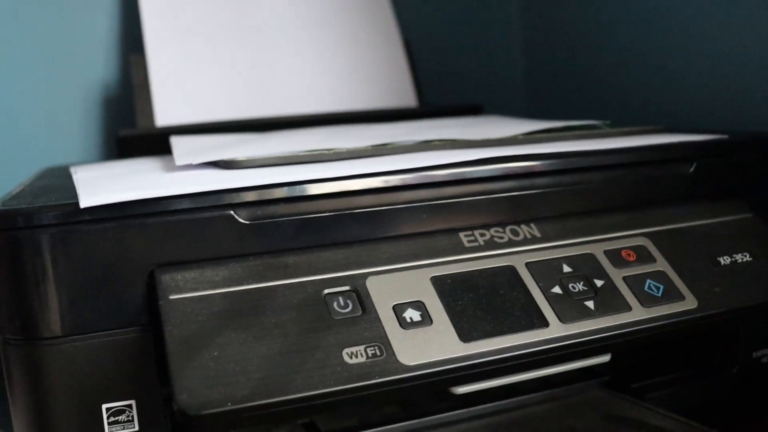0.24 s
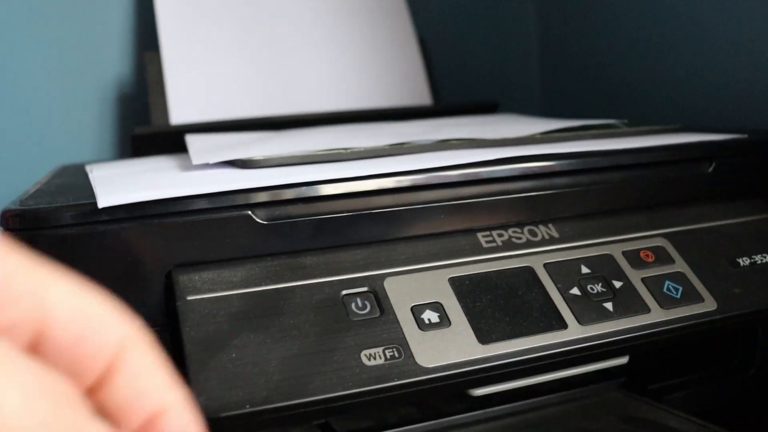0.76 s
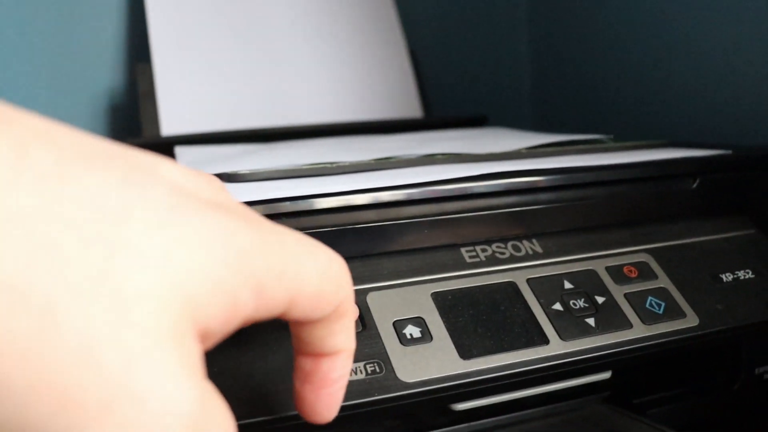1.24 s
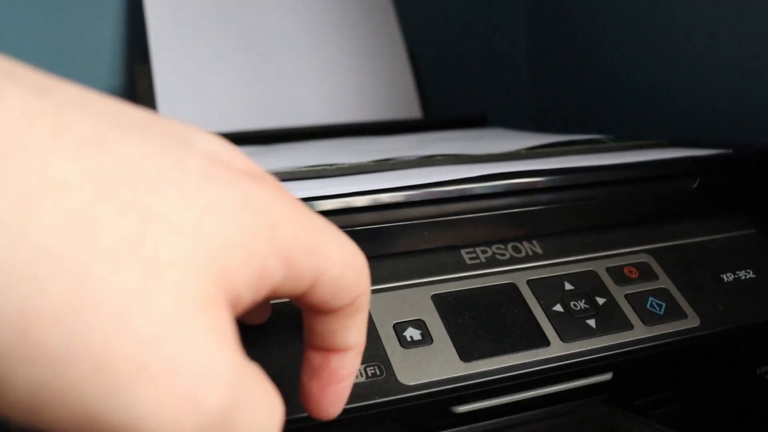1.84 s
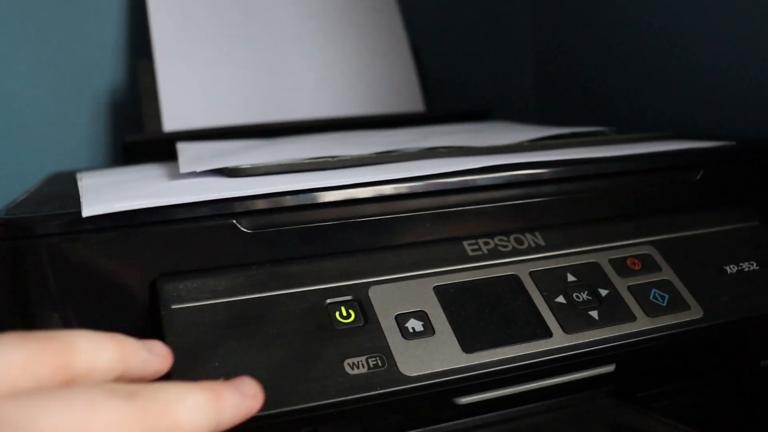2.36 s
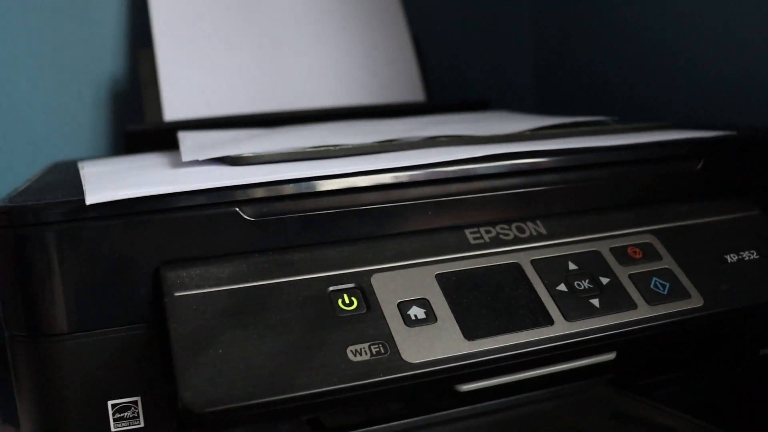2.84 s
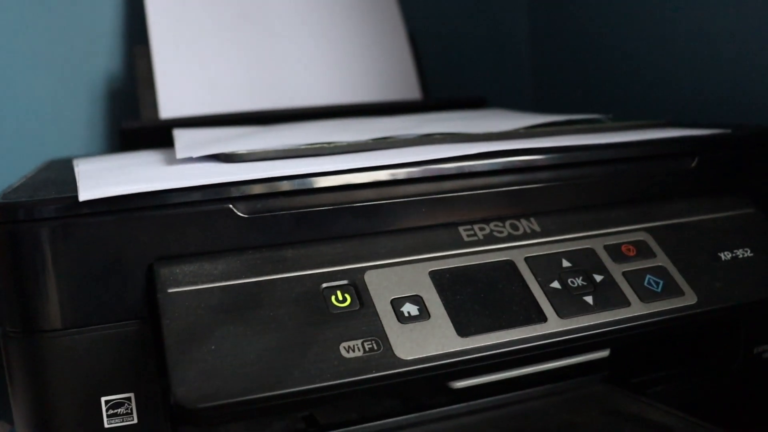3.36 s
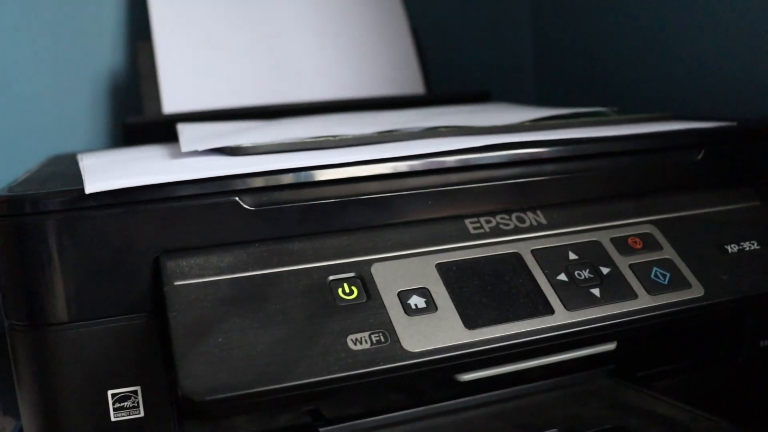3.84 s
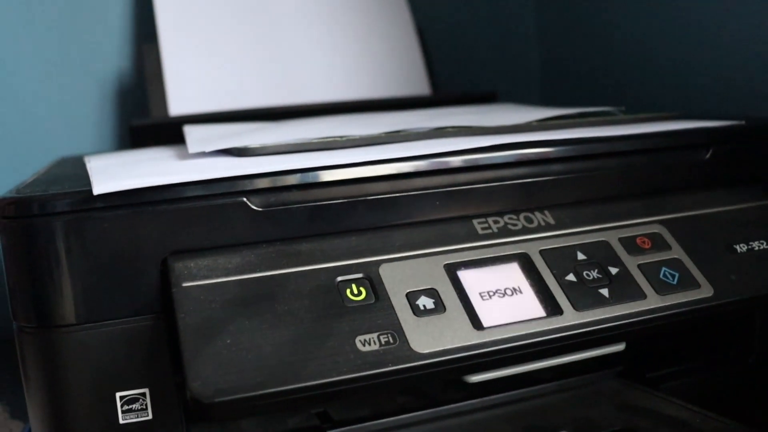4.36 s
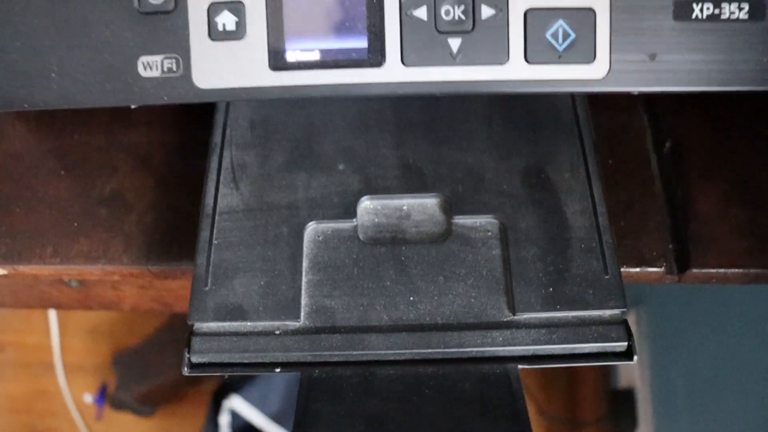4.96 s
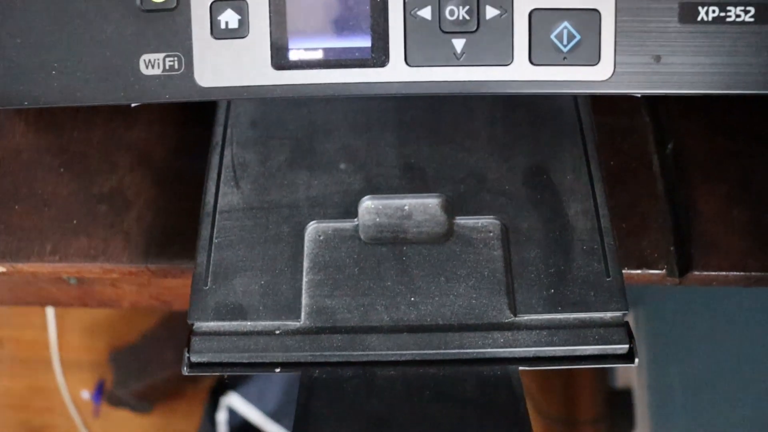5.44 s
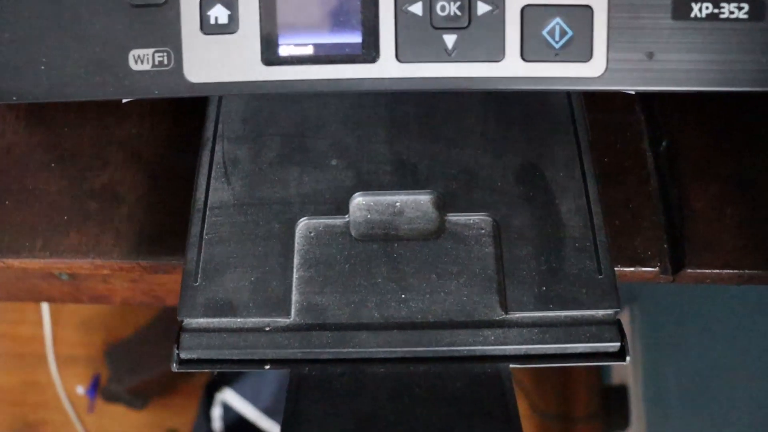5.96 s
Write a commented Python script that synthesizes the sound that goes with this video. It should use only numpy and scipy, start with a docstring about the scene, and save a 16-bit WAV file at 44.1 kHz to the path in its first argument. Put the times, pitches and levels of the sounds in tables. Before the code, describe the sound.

Close indoor handling: soft cloth rustle, faint bumps, crisp power-button clicks, quiet, then a sudden cut to a printer carriage shuttling, hissing and thumping.

```python
"""Close to two microphones in a small room, a sleeve rustles as a finger slides onto a printer's front panel.
The finger rubs, presses and releases the power button: snaps ring the panel, then the arm draws back.
After a cut the inkjet printer is at work: the carriage whirs to and fro about twice a second,
and at each turn the paper feed clacks and thumps in the plastic case.
Filtered noise makes the cloth and hiss, dying sines the knocks, unsteady sines the motor, belt and groans."""
import sys
import numpy as np
from scipy import signal
from scipy.fft import rfft, irfft
from scipy.io import wavfile

SR = 44100
rng = np.random.default_rng(int(sys.argv[2]) if len(sys.argv) > 2 else 0)


def transcribe(u):
    """Save the signal u as a 16-bit wav file named by the first command-line argument.

    u: samples, shape (n,) or (channels, n), limited to [-1, 1]; the rate is SR.
    q: integer samples, one column per channel.
    """
    v = np.clip(np.atleast_2d(u).T, -1, 1)
    q = np.round(v * 32767).astype(np.int16)
    wavfile.write(sys.argv[1], SR, q)


N = 273420
T, HZ = np.arange(N) / SR, np.fft.rfftfreq(N, 1 / SR)


def amp(db):
    """Decibels to gain."""
    return 10 ** (np.asarray(db) / 20)


def unit(x):
    """Scales to rms 1."""
    return x / np.sqrt(np.mean(x ** 2) + 1e-20)


def read(points, hz):
    """Reads a table on a log-frequency axis."""
    f, value = np.transpose(points)
    return np.interp(np.log(hz + 1), np.log(f + 1), value)


def add(mix, s, sound):
    """Mixes a stereo sound in at time s."""
    part = mix[:, round(s * SR):][:, :sound.shape[1]]
    part += sound[:, :part.shape[1]]


def sides(pan_db):
    """Left and right gains; pan_db is left minus right."""
    return amp(np.array([[pan_db], [-pan_db]]) / 2)


def wander(rate):
    """Slow random motion of rms 1, with little above rate in Hz."""
    count = N // 16
    spectrum = rfft(rng.standard_normal(count))
    slow = irfft(spectrum / (1 + (HZ[:count // 2 + 1] / rate) ** 4), count)
    return unit(np.interp(T, np.linspace(0, T[-1], count), slow))


def swell(s, half_s, db):
    """A smooth rise and fall around time s."""
    return amp(db) * np.exp(-((T - s) / half_s) ** 2)


def held(start, end, db, edge_s):
    """Rises around start, holds, falls around end."""
    return amp(db) * np.clip(.5 + np.minimum(T - start, end - T) / (2 * edge_s), 0, 1)


def shelf(hz, corner_hz):
    """Rises from 0 below the corner to 1 above."""
    return 1 - 1 / (1 + (hz / corner_hz) ** 5.0)


def peaks(rows):
    """Resonances as dB over frequency."""
    return sum(db / (1 + (2 * (HZ - hz) / width) ** 2) for hz, width, db in rows)


# how alike the sound is at the two microphones: (frequency [Hz], left-right likeness [0..1])
MICROPHONE_LIKENESS = [(100, 1), (300, 0.94), (700, 0.66), (1500, 0.26), (4000, 0.17), (15000, 0.048)]


def noise(db, lag_ms=0, alike=1):
    """Stereo noise of a given spectrum, most alike in the bass; it reaches the right side lag_ms later."""
    a, b = rfft(rng.standard_normal((2, N)))
    c = np.clip(alike * read(MICROPHONE_LIKENESS, HZ), 0, 1)
    right = c * a + np.sqrt(1 - c ** 2) * b
    right = right * np.exp(-2j * np.pi * HZ * lag_ms / 1000)
    return unit(irfft(np.array([a, right]) * amp(db), N))


def colour(x, gain_db, size=2048):
    """Causal minimum-phase filter with the gain gain_db(hz)."""
    hz = abs(np.fft.fftfreq(size, 1 / SR))
    log_gain = np.log(amp(np.maximum(gain_db(hz), -90)))
    taps = np.fft.ifft(np.exp(np.conj(signal.hilbert(log_gain)))).real
    return signal.fftconvolve(x, taps[None], axes=1)[:, :x.shape[1]]


def resonate(x, hz, width):
    """A resonance that follows the curve hz: shifts it down to 0 Hz, smooths, shifts back up."""
    turn, r = np.exp(2j * np.pi * np.cumsum(hz) / SR), np.exp(-np.pi * width / SR)
    low = signal.lfilter([(1 - r) ** 2], [1, -2 * r, r * r], x / turn)
    return unit((turn * low).real)


def ring(modes, t, spread):
    """Dying modes; each blow shifts them a little in pitch."""
    total = 0
    for k, (hz, db, t60) in enumerate(modes):
        pitch = hz * (1 + spread * rng.standard_normal())
        total = total + (-1) ** k * amp(db - 60 * t / t60) * np.sin(2 * np.pi * pitch * t)
    return total


def squeaks(rows, waver, flutter_db):
    """Short tones of sticking and slipping, unsteady in pitch and level."""
    clock = np.cumsum(1 + waver * wander(95)) / SR
    tones = sum(swell(s, half_s, db) * np.sin(2 * np.pi * hz * clock) for s, half_s, db, hz in rows)
    return np.sqrt(2) * amp(flutter_db * wander(91)) * tones


# decay of the small room: (frequency [Hz], t60 [s])
ROOM_T60 = [(150, 0.28), (600, 0.38), (2000, 0.17), (4500, 0.33), (8000, 0.14), (15000, 0.064)]


def room(x):
    """Diffuse tail of a small room, each band dying at its own speed."""
    hz, t, z = signal.stft(rng.standard_normal((2, SR // 2)), SR, nperseg=256)
    c = np.clip(read(MICROPHONE_LIKENESS, hz), 0, 1)[:, None]
    z[1] = c * z[0] + np.sqrt(1 - c ** 2) * z[1]
    tail = signal.istft(z * amp(-60 * t / read(ROOM_T60, hz)[:, None]), SR, nperseg=256)[1]
    tail *= np.minimum(np.arange(tail.shape[1]) / SR / 0.011, 1)  # builds up over 11 ms
    return signal.fftconvolve(x, tail / np.linalg.norm(tail[0]), axes=1)[:, :x.shape[1]]


# spectrum of the room's air: (frequency [Hz], relative level [dB per Hz])
AIR = [(15, -40), (25, -13.5), (97, -5.5), (120, -4.5), (161, -9.5), (249, -10.5), (1020, -17), (2160, -17),
       (2760, -19), (3620, -18.5), (4250, -18), (12500, -26), (16000, -25.5)]


def room_air():
    """Steady background noise of the place, only partly alike at the two microphones."""
    return amp(-58.0) * noise(read(AIR, HZ), 0, 0.55)


# spectrum of sliding cloth: (frequency [Hz], relative level [dB per Hz])
CLOTH = [(120, -43), (200, -12), (305, 5), (340, -8), (558, -5), (777, -7), (1080, -4.5), (1650, -7),
         (1980, -4), (2380, -7.5), (4120, -5.5), (15100, -24.5), (16000, -107)]
# the arm reaches in and draws back: (start [s], end [s], rustle level [dB])
REACHES = [(-.05, 0.37, -49), (.6, 1.774, -50), (1.895, 2.707, -52.5)]
# faint rustle for as long as the arm is out: (start [s], end [s], level [dB])
SHIFTING = (-.1, 3.05, -54.5)
# the arm settles: (middle [s], half length [s], level [dB])
SHUFFLE = (3.08, 0.076, -51)
# hollow colour of that settling: (frequency [Hz], width [Hz], boost [dB])
SHUFFLE_RINGS = [(400, 17, 14), (563, 17, 15.5), (1400, 70, 6), (1780, 67, 12.5)]
# rasping strokes of the sleeve: (middle [s], half length [s], level [dB], pitch [Hz])
RASPS = [(.05, 0.4, -51.5, 4200), (0.747, 0.059, -52.5, 3900), (0.94, 0.047, -51, 3460),
         (1.133, 0.06, -56, 5300), (1.307, 0.28, -55.5, 3520), (2.033, 0.061, -52, 3700),
         (2.6, 0.083, -53, 3450), (3.009, 0.14, -58, 3250)]
# quick, bright swishes of cloth: (middle [s], half length [s], level [dB])
SWISHES = [(0.104, 0.46, -56.5), (0.64, 0.15, -54.5), (1.145, 0.17, -56.5), (2.295, 0.1, -56.5),
           (2.454, 0.067, -49), (2.68, 0.11, -57), (4.283, 0.087, -43.5), (4.453, 0.061, -38.5)]
# spectrum of the swishes: (frequency [Hz], relative level [dB per Hz])
SWISH_COLOUR = [(880, -19), (1500, -11), (1590, -11.5), (1790, -20), (1940, -14), (2970, -8), (3250, -2.5),
                (4920, 0), (14100, -12), (16000, -16)]
REACH_EDGE_S = 0.055  # the arm gathers speed and comes to rest


def sleeve():
    """Cloth slides over cloth as the arm moves, with a slight flutter and a moving rasp."""
    moving = np.max([held(*row, REACH_EDGE_S) for row in [*REACHES, SHIFTING]], axis=0)
    reach = moving * noise(read(CLOTH, HZ), 0.17, 0.89)
    hollow_db = read(CLOTH, HZ) + peaks(SHUFFLE_RINGS) - 8 * shelf(HZ, 3800)
    shuffle = swell(*SHUFFLE) * noise(hollow_db, 0.11, 0.82)
    s, _, _, hz = np.transpose(RASPS)
    strokes = sum(swell(*row[:3]) for row in RASPS)
    rasp = strokes * resonate(noise(0 * HZ, 0.17, 1.44), np.interp(T, s, hz), 1360)
    swish = sum(swell(*row) for row in SWISHES) * noise(read(SWISH_COLOUR, HZ), 0.233, 0.9)
    flutter = amp(1.0 * wander(63))
    return (reach + shuffle + rasp + swish + whistle()) * flutter


# soft handling bumps:
# (time [s], level [dB], rise [s], t60 [s], dull above [Hz], relative midrange [dB])
BUMPS = [(.04, -52.5, 0.026, 0.93, 440, -45), (0.196, -42, 0.024, 0.6, 360, -21.5),
         (0.719, -46, 0.03, 0.34, 477, -35), (1.622, -45.5, 0.016, 0.24, 220, -50),
         (1.85, -41.5, 0.014, 0.45, 302, -29), (3.335, -48, 0.057, 0.43, 317, -40),
         (3.40, -51, 0.047, 0.42, 364, -46)]
# light, dull taps: (time [s], level [dB])
TAPS = [(3.797, -52), (3.898, -39.5), (3.9222, -44.5)]
# ringing of a tap: (frequency [Hz], relative level [dB], t60 [s])
TAP_MODES = [(193, -5, 0.031), (307, -1, 0.026), (530, -5, 0.028)]
# brief soft hoots as the hand moves: (middle [s], half length [s], level [dB], pitch [Hz])
HOOTS = [(0.655, 0.035, -52, 582), (1.085, 0.036, -50.5, 750), (1.575, 0.034, -53, 448)]
BUMP_LOW_HZ = 100  # the microphones lose the bass below this


def handling():
    """Dull noise bumps, light ringing taps and soft hoots close to the microphones."""
    out, t = np.zeros((2, N)), np.arange(SR // 8) / SR
    for s, db, rise, t60, dull_hz, middle_db in BUMPS:
        age = np.maximum(T - s, 0)
        shape = np.minimum(age / rise, 1) * amp(db - 60 * np.maximum(age - rise, 0) / t60)
        body = 1 - shelf(HZ, dull_hz) + amp(middle_db) * (1 - shelf(HZ, 1638))
        power = body / (1 + (BUMP_LOW_HZ / (HZ + 1)) ** 3)
        out += shape * noise(10 * np.log10(power + 1e-12))
    for s, db in TAPS:
        add(out, s, amp(db) * ring(TAP_MODES, t, 0.042) * sides(0))
    return out + squeaks(HOOTS, 0.016, 3.5)


# the fingertip slides on the panel: (start [s], end [s], relative level [dB])
RUB = (1.066, 1.505, -41)
# a fainter rub that runs on from the slide through the press: (start [s], end [s], relative level [dB])
FAINT_RUB = (1.2, 1.78, -47)
# spectrum of the rub: (frequency [Hz], relative level [dB per Hz])
RUB_COLOUR = [(180, -11), (320, -8.5), (500, -6.5), (1060, -11.5), (1500, -8), (1900, -10), (2200, -10),
              (2600, -7), (3400, -34), (7000, -70)]
# resonances of the rub: (frequency [Hz], width [Hz], relative level [dB])
RUB_RINGS = [(756, 55, -18.5), (1208, 54, -12.5), (1334, 100, -13), (1663, 84, -7.5), (1882, 120, -5),
             (2580, 220, -16)]
# the fingertip sticks and judders: (middle [s], half length [s], level [dB], pitch [Hz])
JUDDERS = [(1.16, 0.043, -49.5, 221.4), (1.338, 0.016, -45.5, 257), (1.388, 0.015, -45, 240),
           (1.437, 0.0096, -44.5, 247.5)]
RUB_EDGE_S = 0.083  # it starts and stops softly
RUB_DRIFT = 0.0029  # share by which the resonances wander
SLIPS_PER_S = 95  # about how often the fingertip catches and slips


def fingertip():
    """Skin rubs on the front panel; its resonances drift and flare in turn, and it judders as it grips."""
    force = np.maximum(held(*RUB, RUB_EDGE_S), held(*FAINT_RUB, RUB_EDGE_S))
    rub = noise(read(RUB_COLOUR, HZ), -0.03, 2.0) * amp(-5.0 + 0.93 * wander(70))
    slips = np.cumsum(SLIPS_PER_S * np.exp(.5 * wander(60))) / SR
    catching = unit(.3 + np.exp(-(slips % 1) / .2))  # each slip starts sharply and dies away
    drive = noise(0 * HZ, -0.035, 0.9) * catching
    rub = rub * np.sqrt(catching)
    for hz, width, db in RUB_RINGS:
        pitch = hz * (1 + RUB_DRIFT * wander(8.3))
        rub = rub + amp(db + 1.4 * wander(12)) * resonate(drive, pitch, width)
    return (force * rub + squeaks(JUDDERS, 0.059, 1.9)) * sides(-1.5)


# snaps of the power button: (time [s], relative level [dB], treble gain [dB], treble above [Hz],
# room send [dB], thin below [Hz], relative spring level [dB])
BUTTON = [(1.5919, -19.5, -4.5, 2700, -17, 200, -9.5), (1.6106, 0.5, -1, 2700, -15, 191, 7),
          (1.8128, -26, -10.5, 2700, -2.5, 500, -19.5), (1.843, 2.5, -15.5, 2940, -14.5, 556, -4),
          (1.8925, -18.5, -4, 2720, -9, 447, 7)]
# colour of the panel: (frequency [Hz], gain [dB])
PANEL = [(100, -46), (250, -8), (450, -12), (800, -4), (1150, -5), (1500, -2.5), (1900, -0.5), (2500, -4),
         (3100, -8), (3900, -5.5), (4900, -15), (5800, -15.5), (8500, -13), (15000, -18.5)]
# ringing of the front panel: (frequency [Hz], relative level [dB], t60 [s])
PANEL_MODES = [(276, -10.5, 0.15), (659, -11.5, 0.14), (1098, -6, 0.062), (1580, -6, 0.057),
               (1880, 6, 0.027), (2430, 7, 0.027), (4010, -0.5, 0.042)]
# ping of the spring: (frequency [Hz], relative level [dB], t60 [s])
SPRING_MODES = [(4430, -1.4, 0.022), (4600, 1, 0.026), (4970, 1, 0.025), (5220, -1.96, 0.02)]
RATTLE_DB, RATTLE_T60_S, RATTLE_PER_S = -15.5, .13, 420  # loose parts chatter after each snap
PANEL_RING_DB = -20.5


def button():
    """The switch snaps: a sharp spike, scatter and loose rattle, the panel's modes and the spring's ping."""
    out, t = np.zeros((2, N)), np.arange(SR // 2) / SR
    for s, db, treble_db, treble_hz, room_db, low_hz, spring_db in BUTTON:
        scatter = 0.25 * noise(0 * HZ, -0.036, 2.3)[:, :len(t)] * amp(-60 * t / 0.041)
        chance = rng.random((3, len(t))) < RATTLE_PER_S / SR
        knocks = rng.standard_normal((3, len(t))) * chance
        loose = unit(knocks[:2] + 1.5 * knocks[2])  # the third row is common to both sides
        scatter += 0.23 * amp(RATTLE_DB - 60 * t / RATTLE_T60_S) * loose
        # the spike comes two samples later on the left
        scatter[0, 10] += 2.9
        scatter[1, 8] += 2.9
        modes = ring(PANEL_MODES, t, 0.0079) + amp(spring_db) * ring(SPRING_MODES, t, 0.0078)
        # the modes build up as the snap spreads across the panel
        modes = modes * (1 - np.exp(-t / 0.004))
        hit = amp(10.0) * colour(scatter, lambda hz: read(PANEL, hz)) + amp(PANEL_RING_DB) * modes
        hit = colour(hit, lambda hz: treble_db * shelf(hz, treble_hz) + 10 * np.log10(shelf(hz, low_hz) + 1e-5))
        add(out, s, amp(db) * (hit + amp(room_db) * room(hit)))
    return out * sides(-1.8)


# a thin whistle in the rustle: (time [s], pitch [Hz], level [dB])
WHISTLE = [(2.27, 4330, -66), (2.36, 4230, -56.5), (2.5, 4020, -63), (2.55, 3400, -56), (2.6, 3500, -52),
           (2.67, 3380, -68)]


def whistle():
    """A thin, fuzzy whistle in the rustle, noise in a narrow band that mostly sinks in pitch."""
    s, hz, db = np.transpose(WHISTLE)
    level = amp(np.interp(T, s, db, left=-120, right=-120))
    return level * resonate(noise(0 * HZ, 0.2, 1.6), np.interp(T, s, hz), width=320)


# the carriage stands still and reverses, every other time at the loud end: (time [s])
TURNS = [4.27, 4.737, 5.205, 5.684, 6.151]
# spectrum of the sliding hiss: (frequency [Hz], relative level [dB per Hz])
RAIL = [(260, -17), (450, -46), (572, -21), (625, -1.5), (806, -7), (1040, -2.5), (1150, -7.5),
        (1360, -3.5), (2160, -11), (3430, -14), (4490, -12), (6340, -12), (9920, -21), (15100, -18),
        (16000, -38)]
# resonances of the rail and frame: (frequency [Hz], width [Hz], boost [dB])
FRAME = [(980, 370, 0), (1337, 92, 0), (1730, 520, 4.5), (2697, 42, 11), (3375, 540, 7), (3960, 410, 5.5),
         (5260, 110, 7.5), (6140, 260, 6.5), (8800, 140, 6)]
# steady tones of the frame while the carriage runs: (frequency [Hz], relative level [dB])
GEARS = [(438, -58), (660, -56.5), (1050, -58.5), (1376, -53.5), (1701, -65)]
# the motor's tones, which glide at each turn: (frequency at full speed [Hz], relative level [dB])
MOTOR = [(306, -53.5), (612, -50)]
# balance of the carriage: (frequency [Hz], left minus right [dB])
BALANCE_DB = [(100, 0), (500, 3), (1000, 0), (2500, -5), (6000, -5), (13000, -6)]
MOTOR_SAG = .42  # share of its pitch that the motor loses in a turn
MOTOR_RAMP_S, MOTOR_BRAKE_S = 0.135, 0.075  # standstill to full speed, and back
MOTOR_LEAD_S, MOTOR_NEAR_S, MOTOR_NEAR_DB = 0.073, 0.088, 9  # it sings out just before the loud end


def carriage():
    """The carriage brakes and speeds up around each turn; its hiss and tones swell and sink with it."""
    from_turn = abs(T[:, None] - np.array(TURNS)).min(1)
    speed = np.sin(np.pi / 2 * np.clip(from_turn / 0.31, 0, 1))
    sliding = np.clip((from_turn - .03) / 0.023, 0, 1)
    # +1 at the louder end of the rail, -1 at the other
    place = np.cos(np.pi * np.interp(T, TURNS, np.arange(len(TURNS))))
    # the pulley makes the hiss throb
    throb = amp(0.89 * np.sin(2 * np.pi * 19.0 * T) + 1.0 * wander(100))
    hiss = amp(-39.5) * noise(read(RAIL, HZ) + peaks(FRAME), -0.085) * (0.31 + 0.39 * sliding) * throb
    tones = np.zeros((2, N))
    for hz, db in GEARS:
        offset = rng.standard_normal((2, 1)) * min(hz / 2500, 2)  # the sides differ more in high tones
        swell_db = 12.4 * place * (1 - shelf(hz, 640))
        drift = (0.17 + hz / 2200) * wander(16.0)
        level = amp(db + swell_db + 0.2 + 0.74 * wander(26) + 2.1 * wander(3.8))
        tones += level * np.sqrt(speed) * np.sin(2 * np.pi * hz * T + offset + 1.3 * drift)
    ramps = [np.maximum((T - s) / MOTOR_RAMP_S, (s - T) / MOTOR_BRAKE_S) for s in TURNS]
    drive = np.min(np.clip(ramps, 0, 1), axis=0)
    shaft = np.cumsum((1 - MOTOR_SAG * (1 - drive)) * (1 + 0.0017 * wander(24))) / SR
    near_db = MOTOR_NEAR_DB * sum(swell(s - MOTOR_LEAD_S, MOTOR_NEAR_S, 0) for s in TURNS[::2])
    # loudest part-way between standstill and full speed
    load_db = 6.5 * np.sin(np.pi * drive)
    # it falls quiet around each turn
    powered = 1 - np.clip(sum(swell(s - .025, 0.029, 0) for s in TURNS), 0, 1)
    motor = 0
    for hz, db in MOTOR:
        level = amp(db + near_db + load_db + 1.5 * place + 1.8 * wander(30))
        motor = motor + drive * powered * level * np.sin(2 * np.pi * hz * shaft)
    whir = amp(-54.5 + 10.0 * place) * resonate(noise(0 * HZ), 500 * (.5 + .5 * speed), 490)
    balance = amp(np.array([[.5], [-.5]]) * read(BALANCE_DB, HZ))
    return irfft(rfft(hiss + amp(3.0) * tones + motor + whir) * balance, N)


# spectrum of the shaking case: (frequency [Hz], relative level [dB per Hz])
CASE = [(18, -66), (30, -58), (80, -27), (118, -14), (140, 7), (183, -2.5), (297, 3.5), (400, -9.5),
        (442, -11), (571, -7.5), (604, -10.5), (803, -25), (900, -11), (1170, -21), (1980, -120)]
# pitch of the belt's wandering hum: (time [s], pitch [Hz])
BELT = [(4.48, 117.5), (4.56, 120.6), (4.8, 169.2), (4.94, 155.1), (5.09, 137.7), (5.49, 135.5),
        (5.6, 122.6), (6.08, 112.4), (6.2, 138)]
# the hum swells where it meets a resonance of the case: (middle [s], half length [s], level [dB])
BELT_SWELLS = [(4.486, .025, -48), (4.64, 0.039, -37), (4.763, 0.064, -38), (4.912, .04, -38.5),
               (5.12, 0.03, -42), (5.467, 0.033, -35.5), (5.853, 0.058, -50)]
BELT_DB = -52.5  # between swells
# the case shakes harder around each turn, and more so as the carriage nears the loud end
SHAKE_DB, SHAKE_TURN_DB, SHAKE_END_DB, SHAKE_END_S = -42, 1.5, 4, 0.14


def case():
    """The moving mass shakes the case, most where it reverses, and the belt hums at a wandering pitch."""
    turns = np.cumsum(np.interp(T, *np.transpose(BELT)) * (1 + 0.013 * wander(40))) / SR
    strength = amp(BELT_DB) + sum(swell(*row) for row in BELT_SWELLS)
    belt = np.sqrt(2) * strength * amp(3.0 * wander(32)) * np.sin(2 * np.pi * turns)
    reversing = sum(swell(s, SHAKE_END_S, 0) for s in TURNS)
    loud_end = sum(swell(s - .06, SHAKE_END_S, 0) for s in TURNS[::2])
    shake = amp(SHAKE_DB + SHAKE_TURN_DB * reversing + SHAKE_END_DB * loud_end)
    notch_db = 7 / (1 + ((HZ - 138) / 30) ** 2)
    drone = shake * noise(read(CASE, HZ) - notch_db)
    return (belt + drone) * sides(-1.1)


# paper feed clacks: (time [s], relative level [dB], treble gain [dB], attack [s])
CLACKS = [(4.696, -26, 7.5, 0.00039), (4.715, -30, 2, .001), (4.744, -31.5, -6, .0006),
          (5.156, -29.5, 13, 0.00079), (5.168, -25, -11, 0.0009), (5.2008, -34, -7, 0.00078),
          (5.2192, -32, -1, 0.0003), (5.2305, -37, 1, .0004), (5.293, -39, -14, .0005),
          (5.642, -29, 4, .0005), (5.659, -27, -17, 0.00075), (5.6935, -32, -11, 0.00047),
          (6.126, -24, -6, 0.0043), (6.168, -34, -3, .0005), (6.178, -35, 3.5, 0.00047)]
# the feed's plastic parts: (frequency [Hz], relative level [dB], t60 [s])
LEVER_MODES = [(767, 0.5, 0.043), (1060, -4, 0.072), (1270, -1.5, 0.17), (1950, -1.5, 0.14),
               (2560, -2, 0.05)]
# spectrum of a clack: (frequency [Hz], gain [dB])
CLACK_COLOUR = [(240, -27), (400, -13.5), (784, 1), (910, -1), (1040, 3), (1670, -5), (2040, -3),
                (3060, -9), (3450, -10), (4060, -19), (10000, -42.5), (13000, -73), (22000, -120)]
# thumps of the mechanism:
# (time [s], relative level [dB], t60 of the damping by the parts in contact [s])
THUMPS = [(4.475, -35, 0.33), (4.677, -18.5, 0.043), (4.757, -25.5, 0.49), (5.149, -17, 0.037),
          (5.2198, -19, 0.38), (5.237, -30, 0.36), (5.259, -28, 0.11), (5.6249, -28.5, 0.24),
          (5.699, -26, 0.39), (6.096, -21.5, 0.075), (6.1737, -14, 0.068)]
# ringing of the case: (frequency [Hz], relative level [dB], t60 before that damping [s])
CASE_MODES = [(133.5, -3, 0.24), (224, 5, 0.063), (291, -2.5, 0.17), (321.3, 4, 0.1), (454, -5, 0.026)]
# the feed's thin whine: (frequency [Hz], level [dB])
WHINE = [(13420, -70), (14710, -68), (15140, -65)]
CHATTER_PER_S = 190  # about how fast the knocks within one clack follow each other


def feed():
    """At each turn the paper is stepped on: gears clack, the case thumps, the drive whines thinly."""
    out, t = np.zeros((2, N)), np.arange(SR // 4) / SR
    for s, db, treble_db, attack_s in CLACKS:
        attack = 1 - np.exp(-t / attack_s)
        rattle = rng.standard_normal((3, len(t))) * amp(-60 * t / 0.065) * attack
        # the teeth knock several times, at uneven gaps
        teeth = np.cumsum(CHATTER_PER_S * np.exp(0.39 * wander(150)[:len(t)])) / SR
        rattle = rattle * unit(0.47 + np.exp(-(teeth % 1) / 0.22))
        both = rattle[:2] + 1.34 * rattle[2]  # the third row is common to both sides
        clack = colour(both, lambda hz: read(CLACK_COLOUR, hz) + treble_db * shelf(hz, 2130))
        ringing = amp(-22) * ring(LEVER_MODES, t, 0.026) * attack
        add(out, s, amp(db + 9.0) * (clack + ringing) * sides(-2.3))
    for s, db, t60 in THUMPS:
        thump = ring(CASE_MODES, t, 0.029) * (1 - np.exp(-t / 0.0025))
        add(out, s, amp(db - 4.5 - 60 * t / t60) * thump * sides(-0.43))
    stepping = sum(np.exp(-((T - s + .01) / 0.072) ** 4) for s in TURNS[1:])
    whine = 0
    for hz, db in WHINE:
        whine = whine + amp(db + 3 * wander(40)) * np.sin(2 * np.pi * hz * T + 1.5 * wander(45))
    # a short squeak as the carriage sets off again
    setting_off = sum(swell(s + .064, 0.0081, 0) for s in TURNS[1:])
    squeak = noise(-np.minimum(abs(HZ - 6550) / 30, abs(HZ - 13700) / 30 + 3))
    return out + amp(-13.5) * room(out) + stepping * whine + amp(-48.5) * setting_off * squeak


# parts of the frame buzz as the carriage passes them:
# (middle [s], half length [s], level before panning [dB], frequency [Hz], width [Hz])
BUZZES = [(4.58, 0.1, -54.5, 5180, 70), (5.085, 0.044, -60, 8830, 90), (5.35, .07, -63, 8900, 100),
          (5.393, .05, -47, 3447, 170), (6.04, 0.057, -59.5, 8820, 90)]


def buzzes():
    """Narrow, fuzzy resonances of the frame that flare up for part of a pass."""
    out = 0
    for s, half_s, db, hz, width in BUZZES:
        band_db = -20 * np.log10(1 + (2 * (HZ - hz) / width) ** 2)
        out = out + swell(s, half_s, db) * noise(band_db)
    return out * sides(-7)


# low groans of the case, some gliding up or down, some nearly level:
# (start [s], end [s], first pitch [Hz], last pitch [Hz], relative level [dB])
GROANS = [(4.739, 4.868, 350.6, 305, -41.5), (5.062, 5.174, 268.5, 263.4, -38),
          (5.138, 5.235, 238.5, 179, -41), (5.246, 5.342, 204, 298, -41.5), (5.57, 5.8, 257.7, 241, -44.5),
          (6.0, 6.103, 265.3, 274, -41.5), (6.093, 6.159, 261.8, 196, -35.5)]


def groans():
    """Low, slightly rough groans of the case, sines that glide up or down or stay nearly level."""
    unsteady = 1 + .015 * wander(65)
    tones = 0
    for start, end, first_hz, last_hz, db in GROANS:
        pitch = unsteady * np.interp(T, [start, end], [first_hz, last_hz])
        tones = tones + held(start, end, db, edge_s=0.021) * np.sin(2 * np.pi * np.cumsum(pitch) / SR)
    return np.sqrt(2) * tones * amp(2.0 * wander(45)) * sides(-0.77)


# the sheet scrapes briefly: (middle [s], relative level [dB], half length [s], pitch [Hz])
SCRAPES = [(4.979, -53, 0.0087, 2900), (5.838, -43, 0.011, 2750), (5.864, -45, 0.027, 2455)]


def paper():
    """The sheet scrapes over its guides in short, grainy strokes, each at its own pitch."""
    s, _, _, hz = np.transpose(SCRAPES)
    strokes = sum(swell(middle, half_s, db) for middle, db, half_s, _ in SCRAPES)
    grain = amp(3.0 * wander(230))
    return strokes * grain * resonate(noise(0 * HZ, -0.054), np.interp(T, s, hz), 850) * sides(-3.5)


CUT_OUT, CUT_IN = 4.457, 4.474  # switching on ends, printing begins [s]


def scene():
    """Switching on, a near silence of faint air at the cut, then printing."""
    air = room_air()
    switching_on = air + sleeve() + handling() + fingertip() + button()
    printing = air + carriage() + buzzes() + groans() + case() + feed() + paper()
    before = np.clip((CUT_OUT - T) / 0.0017, 0, 1)
    after = np.clip((T - CUT_IN) / 0.00034, 0, 1)
    return switching_on * before + printing * after + amp(-22.0) * air


EDGE_HZ = 15900  # upper band limit


def record(dry):
    """The microphones lose the deepest bass and round off the sharpest peaks; then the band limit."""
    thin = signal.sosfilt(signal.butter(2, 36, "high", fs=SR, output="sos"), dry)
    rounded = .85 * np.tanh(thin / .85)
    low_pass = signal.firwin(511, EDGE_HZ, window=("kaiser", 9), fs=SR)
    return signal.oaconvolve(rounded, low_pass[None], "same")


dry = scene()
out = record(dry)
transcribe(out)
```